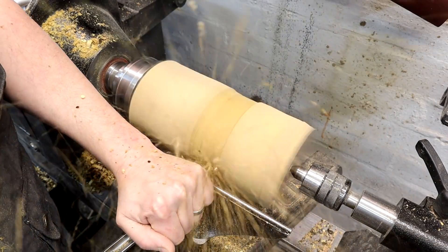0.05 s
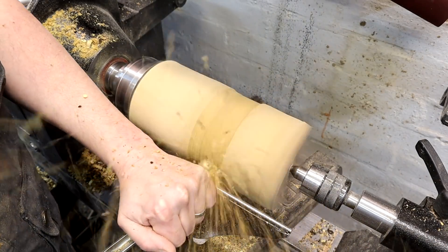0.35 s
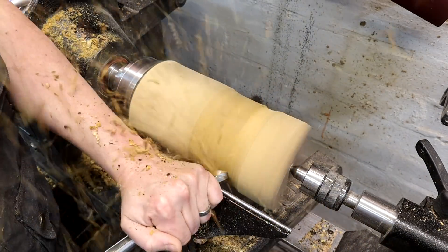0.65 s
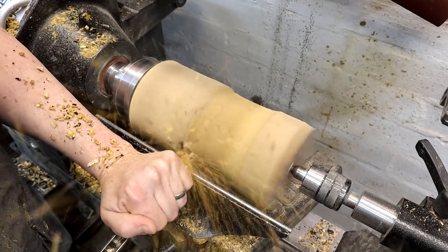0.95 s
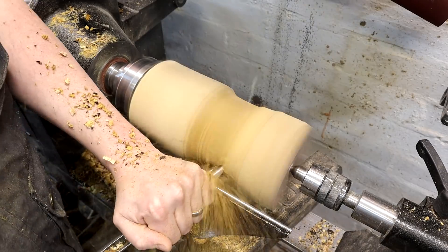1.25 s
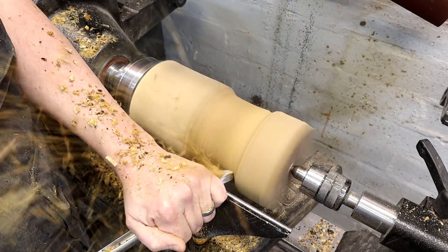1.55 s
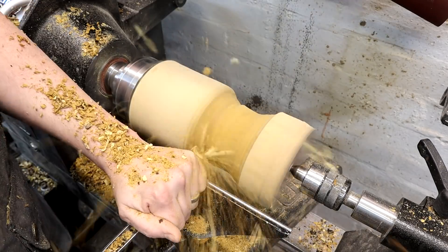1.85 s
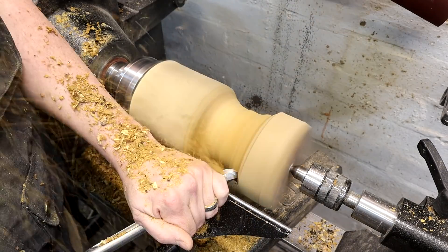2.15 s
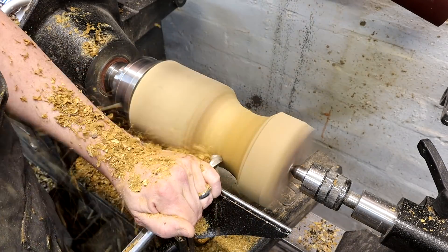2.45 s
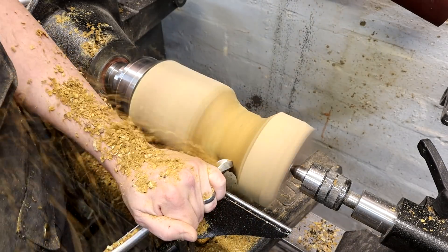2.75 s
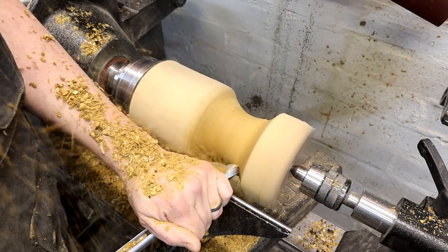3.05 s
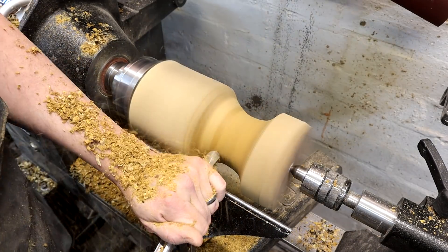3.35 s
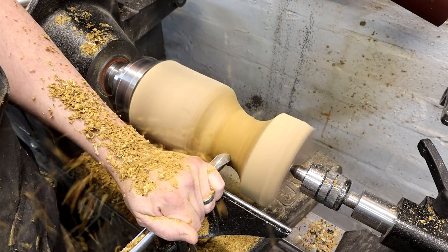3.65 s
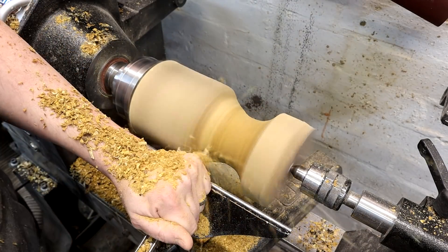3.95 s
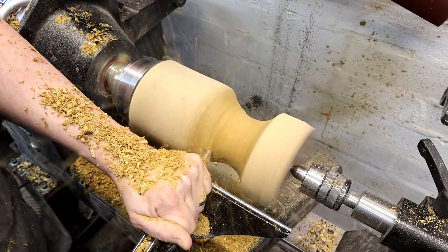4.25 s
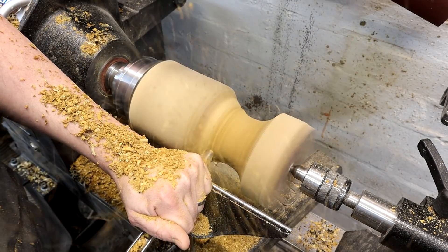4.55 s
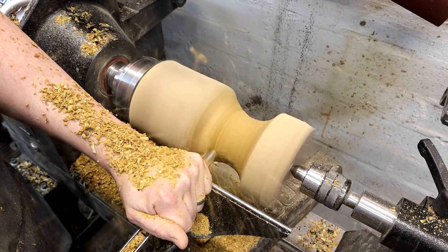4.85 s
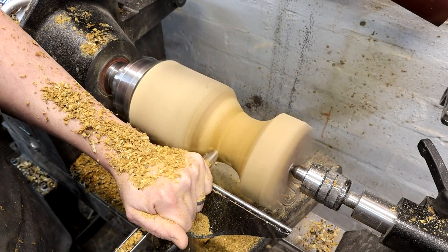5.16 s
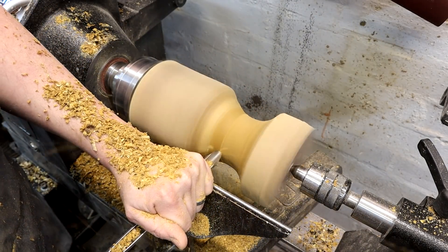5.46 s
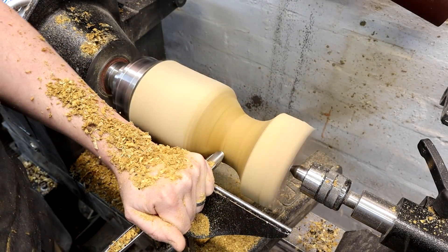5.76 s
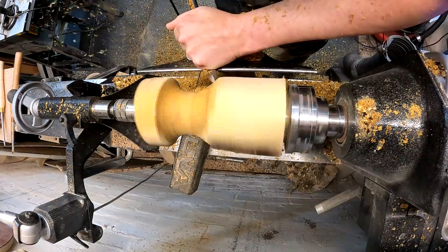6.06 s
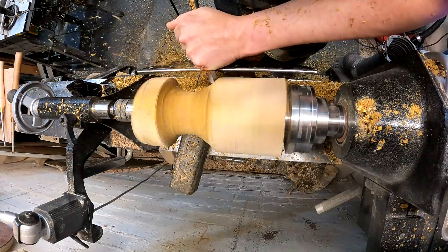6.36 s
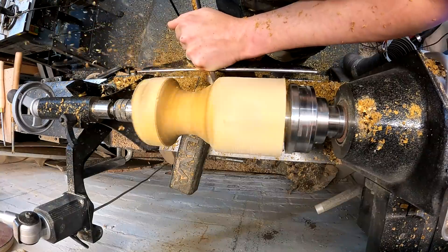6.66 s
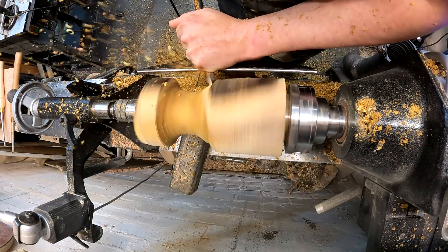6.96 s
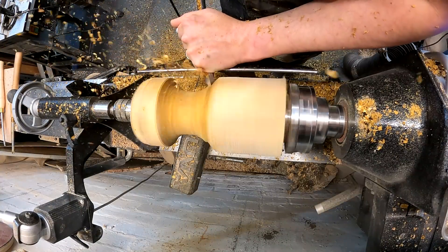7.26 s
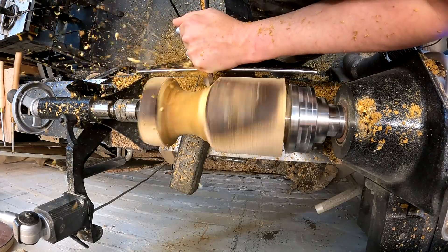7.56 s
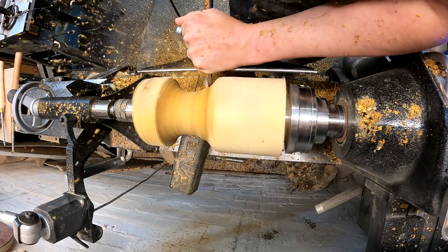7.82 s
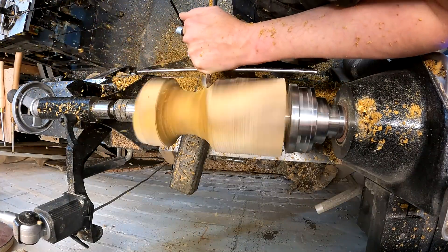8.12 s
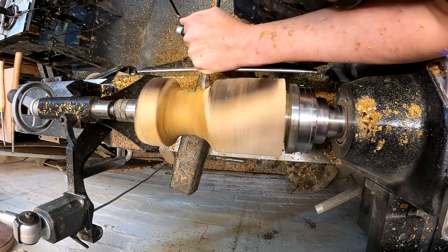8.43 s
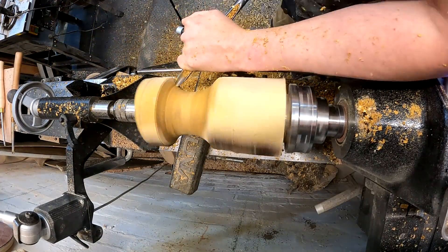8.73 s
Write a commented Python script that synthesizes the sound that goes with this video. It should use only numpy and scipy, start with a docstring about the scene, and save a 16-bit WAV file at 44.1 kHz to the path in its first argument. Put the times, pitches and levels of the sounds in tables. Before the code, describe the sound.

Close woodturning: rough bursts of scraping and splintering give way to a sustained cut, then a throbbing one with the lathe humming.

```python
"""A gouge hollows a waist into a wood blank spinning on a lathe, close up and in mono in a dry workshop.
Snapping fibres excite the resonances of blank, gouge and tool rest, and stick-slip at the edge squeals.
Choppy roughing strokes throw chips amid low gusts, then one long deep cut fades out. From across the
lathe, where the motor hums louder, a finishing cut throbs with every turn of the blank."""
import sys
import numpy as np
from scipy import signal
from scipy.fft import rfft, irfft, next_fast_len
from scipy.io import wavfile

SR = 44100
rng = np.random.default_rng(int(sys.argv[2]) if len(sys.argv) > 2 else 0)


def dump(signal):
    """Clip the signal to [-1, 1] and save it as 16-bit WAV at the path in sys.argv[1]."""
    limited = np.clip(np.atleast_2d(signal).T, -1, 1)
    pcm = np.round(limited * 32767).astype(np.int16)
    wavfile.write(sys.argv[1], SR, pcm)


N = 387638
TAPS = 8192
TIME = np.arange(N) / SR
HZ = np.maximum(np.fft.rfftfreq(TAPS, 1 / SR), 1)

TURN_HZ, MOTOR_HZ = 16.5, 49.53   # about three turns of the motor to one of the blank
FAR_SIDE_S = 5.878   # from here on the lathe is heard from its far side
DRONE_HZ, DRONE_DB, DRONE_BUILD_S = 327.3, -35, 0.14
BEAT_DB, BEAT_PERIOD_S, BEAT_PEAK_S = 4.5, 0.96, 6.86

# Low gusts: t/s, peak level/dB, half-length/s
GUST_PULSES = [(1.55, -43, .04), (3.64, -50, .04), (4.193, -34, 0.078), (4.796, -53.5, 1.4)]
# Spectra of the gusts and of the lathe's rush from either side: f/Hz, relative density/dB
GUST_SPECTRUM = [(12, -20), (28, -0.5), (80, -6), (300, -38)]
NEAR_RUSH_SPECTRUM = [(24, -22), (40, -5.5), (321, -2), (856, -5), (3300, -17), (6880, -52), (14000, -37)]
FAR_RUSH_SPECTRUM = [(24, -39), (40, -31.5), (329, -5), (453, -10.5), (1120, -15), (1500, -47), (8160, -58),
                     (14000, -100)]
# Rush of belt and bearings on the far side: t/s, level/dB
FAR_RUSH_LEVEL = [(5.9, -28.5), (6.4, -31.5), (7.1, -34), (8.7, -34.5)]
# Motor tones: f/Hz, near level/dB, mean far level/dB, width/Hz
MOTOR_TONES = [(100.5, -71.5, -50, 3.9), (145, -72, -44.5, 6.8), (229.4, -87, -44.5, 7.6),
               (310, -57.5, -70, 5.1)]
# Modes of blank, gouge and tool rest in each cut: f/Hz, half-width/Hz (at least 32 is used), gain/dB
ROUGHING_RESONANCES = [(373, 28, -9.5), (880, 84, -8.5), (1437, 26, -3), (2000, 23, -32), (2330, 25, -2),
                       (3214, 116, -0.5), (3585, 115, 6.5), (4210, 270, -9), (4830, 104, -8),
                       (5370, 29, -8.5), (5880, 67, -11.5)]
DEEP_RESONANCES = [(870, 44, -1), (1413, 21, 4.5), (2384, 25, 4.5), (2622, 66, 2), (3153, 87, 1),
                   (3570, 200, -3), (4000, 140, -6), (4340, 68, -11), (4494, 29, -7.5), (4820, 130, -11.5),
                   (5220, 78, -13), (5770, 154, -10)]
FINISHING_RESONANCES = [(1140.6, 11, 6.5), (1699, 60, 8.5), (1861, 16, 10.5), (2537, 69, 3), (2783, 34, 7),
                        (3120, 60, -24), (3440, 99, -27), (3997, 61, 3.5), (4540, 82, -5.5),
                        (4990, 155, -7), (5670, 40, -6)]
# Broad response beneath the modes: f/Hz, relative density/dB
ROUGHING_SPECTRUM = [(110, -40), (175, -6.5), (700, -9.5), (1250, -5), (1550, 0.5), (3400, 3.5),
                     (4600, -12), (6100, -12.5), (7600, -29), (13000, -18), (16000, -28.5)]
DEEP_SPECTRUM = [(90, -31.5), (210, -12.5), (380, -9), (600, -11), (1250, -6.5), (1550, 2.5), (2150, -2),
                 (3400, -1.5), (4600, -29), (6800, -21), (7700, -36), (10700, -25.5), (11500, -28.5),
                 (16000, -31)]
FINISHING_SPECTRUM = [(90, -38), (230, -8), (700, -2), (1500, 9.5), (2200, 3.5), (3400, 4), (4400, -4.5),
                      (5500, -7.5), (6500, -23.5), (9000, -66), (10700, -38), (11500, -56), (16000, -60)]
# Rasp of the wood, ring of the gouge, hiss of the edge and spray of chips, one row each:
# level at full pressure/dB, sensitivity to pressure/(dB/dB), trend/(dB/s)
ROUGHING_BANDS = [(-19, 1.22, -2.5), (-21.5, 0.96, -4), (-20, 1.36, -9), (-30.5, 1.18, -14)]
DEEP_BANDS = [(-23, 0.65, -0.65), (-22, 1.3, -0.2), (-31, 1.33, 1.9), (-31.5, 0.8, -7.5)]
FINISHING_BANDS = [(-22.5, 0.73, -0.45), (-24, 1.16, 0.83), (-25, 1.53, -4), (-44.5, 0.5, -4.5)]
# Roughing strokes: start/s, end/s, entry/s, lift/s, pressure level/dB, easing/(dB/s), brightness/dB
ROUGHING_STROKES = [(-.05, 0.53, .03, 0.031, -24.5, 8, 1), (.573, 0.943, .048, .04, -28.5, 2, 1),
                    (0.891, 1.413, 0.03, 0.015, -28, 2.5, 4), (1.46, 1.774, .095, .15, -29, 3, 4.5),
                    (1.768, 2.064, 0.13, 0.12, -29.5, -7, 0), (2.128, 2.591, 0.022, 0.016, -26, 32, 3),
                    (2.655, 2.916, 0.077, 0.039, -21, 64, 0), (2.9, 3.253, 0.017, 0.076, -30.5, -0.5, -0.5),
                    (3.182, 3.446, 0.11, 0.014, -33.5, -3, -3.5), (3.498, 3.935, 0.032, 0.1, -25.5, 20, -3)]
# Pressure on the gouge in the long cuts, expressed as loudness: t/s, level/dB
DEEP_PRESSURE = [(3.97, -46), (3.99, -25), (4.022, -21), (4.208, -17.5), (4.668, -19.5), (5.096, -22),
                 (5.314, -27.5), (5.54, -22.5), (5.642, -40), (5.694, -30.5), (5.87, -50)]
FINISHING_PRESSURE = [(5.88, -30), (6.09, -20.5), (7.88, -18), (8.45, -19), (8.57, -24), (8.63, -46),
                      (8.7, -48), (8.71, -29.5), (8.72, -37), (8.77, -22.5), (8.79, -24)]
# The edge catches and tears out a splinter: t/s, relative peak level/dB
SPLINTERS = [(.614, -13), (.703, -12), (1.001, -8), (1.085, -9), (1.626, -8), (1.964, -10), (1.992, -6),
             (2.253, -4), (2.352, -6), (2.441, -8), (2.526, -11), (2.79, -8), (2.888, -12), (3.101, -9),
             (3.157, -11), (3.612, -4), (3.71, -10), (3.778, -6), (3.841, -11), (3.882, -16)]
# Squeals of the gouge: start/s, end/s, f/Hz, width/Hz, level/dB
GOUGE_SQUEALS = [(1.909, 2.014, 3230, 60, -22.5), (2.24, 2.589, 3540, 60.3, -28),
                 (2.288, 2.588, 3150, 70, -27), (2.727, 2.907, 3195, 80, -23.5),
                 (3.516, 3.897, 3050, 130, -25), (4.6, 5.25, 3150, 25, -26.5), (6.7, 8.2, 2800, 45.2, -27),
                 (7.2, 8.559, 4058, 36, -27), (8.481, 8.585, 3180, 30, -25)]
# Hoarse whistles of fresh bites: start/s, end/s, level/dB
BITE_WHISTLES = [(0.899, 1.35, -29.5), (1.795, 1.956, -35.5), (2.135, 2.34, -30.5), (2.908, 3.21, -26.5)]


def from_db(db):
    """Amplitude ratio of a level: 20 dB to a factor of ten."""
    return 10 ** (np.asarray(db) / 20)


def rms_one(x):
    """Normalisation to unit mean power."""
    return x / np.sqrt(np.mean(x ** 2) + 1e-20)


def level_curve(points):
    """Linear interpolation of a level in dB at every sample."""
    return np.interp(TIME, *np.transpose(points))


def colour(spectrum):
    """Amplitude response, interpolated in dB over logarithmic frequency."""
    hz, db = np.transpose(spectrum)
    return from_db(np.interp(np.log(HZ), np.log(hz), db))


def drift(rate_hz):
    """Random fluctuation: Gaussian noise low-passed at rate_hz, rms 1."""
    size = next_fast_len(N)
    lowpass = 1 + (np.fft.rfftfreq(size, 1 / SR) / rate_hz) ** 4
    return rms_one(irfft(rfft(rng.standard_normal(size)) / lowpass)[:N])


def through(x, gain):
    """Minimum-phase filtering by the folded cepstrum; the power of white noise is conserved."""
    cepstrum = irfft(np.log(gain / gain.max() + 1e-6))
    cepstrum[1:TAPS // 2] *= 2
    cepstrum[TAPS // 2 + 1:] = 0
    response = irfft(np.exp(rfft(cepstrum)))
    return signal.oaconvolve(x, response / np.linalg.norm(response))[:N]


def workshop(x, level_db, t60_s, dull_hz):
    """Reverberation: the cluttered room returns a weak, dull, exponentially decaying tail."""
    age = TIME[:TAPS]
    tail = rng.standard_normal(TAPS) * from_db(-60 * age / t60_s) * (age > .004)
    tail = signal.sosfilt(signal.butter(2, dull_hz, fs=SR, output="sos"), tail / np.linalg.norm(tail))
    return from_db(level_db) * signal.oaconvolve(x, tail)[:N]


def buffeting():
    """Gusts on the near side: low-frequency noise under Gaussian envelopes."""
    strength = sum(from_db(db) * np.exp(-((TIME - s) / half_s) ** 2) for s, db, half_s in GUST_PULSES)
    return (TIME < FAR_SIDE_S) * strength * through(rng.standard_normal(N), colour(GUST_SPECTRUM))


def machine_tone(hz, width_hz, waver_db):
    """Random modulation of phase and amplitude broadens a spectral line."""
    phase = 2 * np.pi * hz * TIME + 0.24 * drift(width_hz)
    return rms_one(np.sin(phase) * from_db(waver_db * drift(width_hz)))


def headstock():
    """Slow beats modulate a far-side drone that builds up as the cut loads the spindle."""
    beat = np.cos(2 * np.pi * (TIME - BEAT_PEAK_S) / BEAT_PERIOD_S)
    load = 1 - np.exp(-np.maximum(TIME - FAR_SIDE_S, 0) / DRONE_BUILD_S)
    return load * from_db(DRONE_DB + BEAT_DB * beat) * machine_tone(DRONE_HZ, width_hz=8, waver_db=2)


def lathe(near_rush_db):
    """Motor tones superpose on the broadband rush of belt and bearings, louder on the far side."""
    far = np.clip((TIME - FAR_SIDE_S) / .006, 0, 1)
    white = rng.standard_normal(N)
    far_rush_db = level_curve(FAR_RUSH_LEVEL)
    near_rush = from_db(near_rush_db) * through(white, colour(NEAR_RUSH_SPECTRUM))
    far_rush = from_db(far_rush_db) * through(white, colour(FAR_RUSH_SPECTRUM))
    swell_db = far_rush_db - np.average(far_rush_db, weights=far)
    hum = np.zeros(N)
    for hz, near_db, far_db, width_hz in MOTOR_TONES:
        amplitude = (1 - far) * from_db(near_db) + far * from_db(far_db + swell_db)
        hum += amplitude * machine_tone(hz, width_hz, waver_db=2.8)
    return (1 - far) * near_rush + far * far_rush + hum


def stick_slip(start, end, first_hz, last_hz, width_hz):
    """Friction oscillation of the edge: narrow-band noise on a carrier, swelling and fading."""
    out, during = np.zeros(N), (TIME > start) & (TIME < end)
    progress = np.linspace(0, 1, during.sum())
    phase = 2 * np.pi * np.cumsum(first_hz * (last_hz / first_hz) ** progress) / SR
    lowpass = signal.butter(2, width_hz, fs=SR, output="sos")
    waver = signal.sosfilt(lowpass, rng.standard_normal((2, SR // 2 + len(phase))))[:, SR // 2:]
    envelope = np.sqrt(np.abs(np.sin(np.pi * progress)))
    out[during] = envelope * rms_one(waver[0] * np.cos(phase) + waver[1] * np.sin(phase))
    return out


def squeals():
    """Stick-slip gives squeals of steady pitch, and whistles that fall as a fresh bite deepens."""
    steady = sum(from_db(db) * stick_slip(start, end, hz, hz, width_hz)
                 for start, end, hz, width_hz, db in GOUGE_SQUEALS)
    falling = sum(from_db(db) * stick_slip(start, end, first_hz=5000, last_hz=3330, width_hz=610)
                  for start, end, db in BITE_WHISTLES)
    return steady + falling


def body(spectrum, modes, broad_db):
    """Modes add in power to a broad response; a half-width of at least 32 Hz keeps each ring short."""
    peaks = sum(from_db(2 * db) / (1 + ((HZ - hz) / max(width, 32)) ** 2) ** 2 for hz, width, db in modes)
    return np.sqrt(peaks + (from_db(broad_db) * colour(spectrum)) ** 2)


def split_bands(response):
    """Power-complementary division of a response into rasp, ring, hiss and spray."""
    below = [1 / (1 + (HZ / edge_hz) ** 24) for edge_hz in (2800, 4200, 7500)]
    shares = np.diff(below, axis=0, prepend=0, append=1)
    return response * np.sqrt(np.abs(shares))


def snaps(per_s, spread_db):
    """Shot noise: random impulses of uneven size, rms 1."""
    sizes = from_db(spread_db * np.minimum(rng.exponential(1, N), 4))
    return rms_one(sizes * rng.choice([-1, 1], N) * (rng.random(N) < per_s / SR))


def fibres(per_s, spread_db, repeat):
    """Fracture of fibres: the share `repeat` of the power recurs with each motor turn and buzzes."""
    periodic = np.resize(snaps(per_s, spread_db)[:round(SR / MOTOR_HZ)], N)
    return np.sqrt(1 - repeat) * snaps(per_s, spread_db) + np.sqrt(repeat) * rms_one(periodic)


def catches(response, level_db, swell_s, die_s, dull_hz):
    """Transient excitation: each catch is a brief crunch of fibres that sets the gouge ringing."""
    force = np.zeros(N)
    for s, db in SPLINTERS:
        during = np.abs(TIME - s) < .05
        age = TIME[during] - s
        force[during] += from_db(db + level_db) * np.exp(np.minimum(age / swell_s, -age / die_s))
    return through(force * snaps(12000, spread_db=1.5), response / (1 + (HZ / dull_hz) ** 4))


def skips(loss_db, rate_hz):
    """Loss of contact: the level drops briefly when the edge jumps off the wood."""
    return from_db(-loss_db * np.maximum(drift(rate_hz) - 1, 0))


def bite(throb_db, double_db, judder_db, judder_hz, grit_db):
    """Modulation of cutting depth: once and twice a turn as the grain comes round, and at random."""
    angle = 2 * np.pi * TURN_HZ * (TIME - .035)   # the high spot first meets the edge at 35 ms
    turning = throb_db * np.cos(angle) + double_db * np.cos(2 * angle)
    judder = judder_db * 2 * np.tanh(drift(judder_hz) / 2)
    return rms_one(from_db(turning + judder + grit_db * drift(rate_hz=240)))


def band_gains(bands, pressure_db, age, full_db=-20):
    """Each band follows a power law of pressure, with its own trend as the edge sinks in."""
    return np.array([from_db(db + sensitivity * (pressure_db - full_db) + db_per_s * age)
                     for db, sensitivity, db_per_s in bands])


def long_stroke(pressure, bands, margin_s=.002):
    """Sustained contact: the band gains follow the varying pressure of the hand."""
    start, end = pressure[0][0], pressure[-1][0]
    during = (TIME > start - margin_s) & (TIME < end + margin_s)
    return during * band_gains(bands, level_curve(pressure), during * (TIME - start))


def short_strokes(clear_db):
    """Intermittent contact: strokes enter, ease off or bear down, and lift; overlaps add in power."""
    power = np.zeros((4, N))
    for start, end, entry_s, lift_s, level_db, easing_db_per_s, bright_db in ROUGHING_STROKES:
        during = (TIME > start) & (TIME < end)
        age = TIME[during] - start
        clearance = np.clip(np.maximum(1 - age / entry_s, 1 - (end - start - age) / lift_s), 0, 1)
        pressure_db = level_db - easing_db_per_s * age - clear_db * clearance ** 2
        brightness = from_db([[0], [0], [bright_db], [bright_db]])
        power[:, during] += (band_gains(ROUGHING_BANDS, pressure_db, age) * brightness) ** 2
    return np.sqrt(power)


def cut(gains, response, depth, per_s, spread_db, repeat, rasp_exponent):
    """Forced vibration: one depth of cut modulates the impulses of wood, gouge, edge and chips."""
    rasp, ring, hiss, spray = gains
    forces = [rasp * depth ** rasp_exponent * fibres(per_s, spread_db, repeat),
              ring * depth * snaps(per_s, spread_db),
              hiss * depth * snaps(per_s, spread_db),
              spray * depth * snaps(5000, spread_db=2.2)]
    return sum(through(force, band) for force, band in zip(forces, split_bands(response)))


def finishing(squeal):
    """Periodic amplitude modulation: a fine cut throbs with the turning blank."""
    response = body(FINISHING_SPECTRUM, FINISHING_RESONANCES, broad_db=-6)
    depth = bite(throb_db=.9, double_db=.25, judder_db=.2, judder_hz=60, grit_db=.4)
    gains = long_stroke(FINISHING_PRESSURE, FINISHING_BANDS)
    shaving = cut(gains, response, depth, per_s=16000, spread_db=1.6, repeat=.27, rasp_exponent=2.5)
    return shaving + squeal * depth


def deep_cut(squeal):
    """Continuous excitation: the buried edge peels an even stream of shavings."""
    response = body(DEEP_SPECTRUM, DEEP_RESONANCES, broad_db=-4)
    depth = bite(throb_db=.5, double_db=.5, judder_db=1.63, judder_hz=50, grit_db=.45)
    gains = long_stroke(DEEP_PRESSURE, DEEP_BANDS)
    peeling = cut(gains, response, depth, per_s=12000, spread_db=2.5, repeat=.18, rasp_exponent=.76)
    return peeling + squeal * depth


def roughing(squeal):
    """Irregular excitation: the gouge bounces, skips and catches on the blank; its squeal breaks up."""
    response = body(ROUGHING_SPECTRUM, ROUGHING_RESONANCES, broad_db=-8.5)
    bounce = bite(throb_db=.2, double_db=.6, judder_db=2.1, judder_hz=50, grit_db=1)
    depth = rms_one(bounce * skips(loss_db=8, rate_hz=50))
    gains = short_strokes(clear_db=28)
    strokes = cut(gains, response, depth, per_s=10000, spread_db=3.5, repeat=0, rasp_exponent=1.1)
    splinters = catches(response, level_db=-6.5, swell_s=.0022, die_s=.0048, dull_hz=9500)
    return strokes + squeal * rms_one(depth ** 1.55) + splinters


def scene():
    """Superposition of cuts, room, machine and gusts, alike in both channels."""
    squeal = squeals()
    deep, far = TIME > DEEP_PRESSURE[0][0], TIME > FAR_SIDE_S
    cutting = roughing(squeal * ~deep) + deep_cut(squeal * (deep & ~far)) + finishing(squeal * far)
    room = workshop(cutting, level_db=-13.5, t60_s=.028, dull_hz=4900)
    mono = cutting + room + lathe(near_rush_db=-51) + headstock() + buffeting()
    return np.array([mono, mono])


def record(dry):
    """Attenuation: the level dips briefly late in the finishing cut; a steep low-pass cuts the top."""
    dip_s, dip_db, recovery_s, cutoff_hz = 8.47, -20, .009, 15850
    dip = from_db(dip_db * (TIME > dip_s) * np.exp(-np.abs(TIME - dip_s) / recovery_s))
    return signal.sosfilt(signal.ellip(12, .1, 80, cutoff_hz, fs=SR, output="sos"), dry * dip)


dry = scene()
out = record(dry)
dump(out)
```